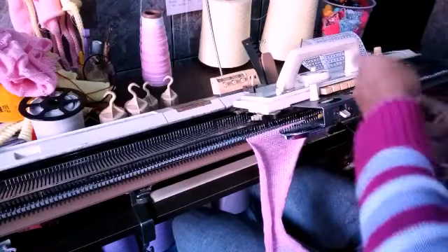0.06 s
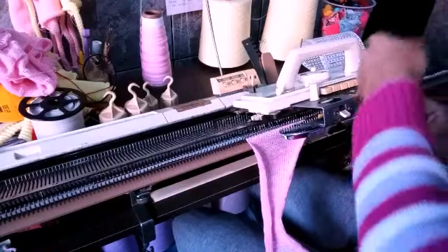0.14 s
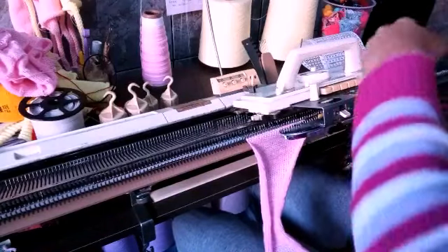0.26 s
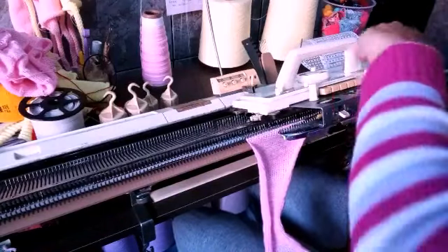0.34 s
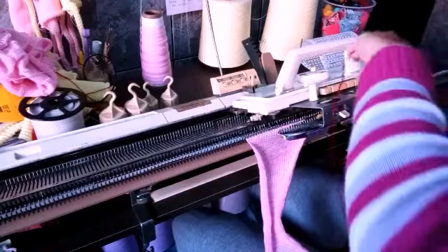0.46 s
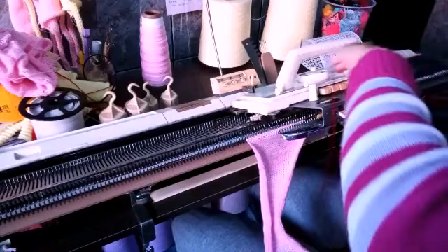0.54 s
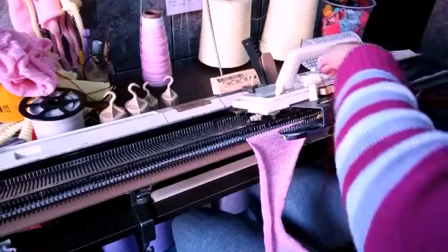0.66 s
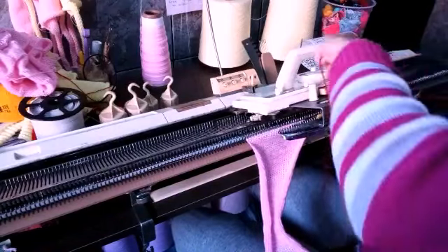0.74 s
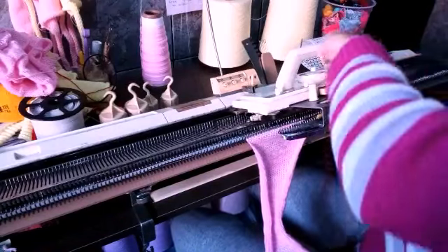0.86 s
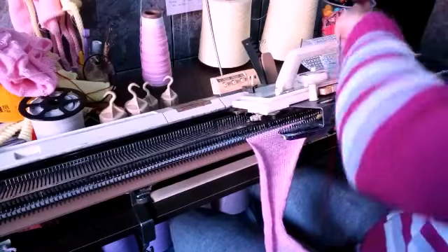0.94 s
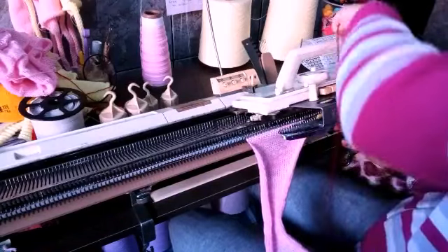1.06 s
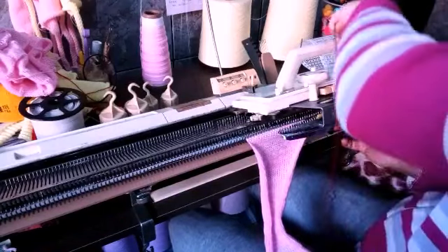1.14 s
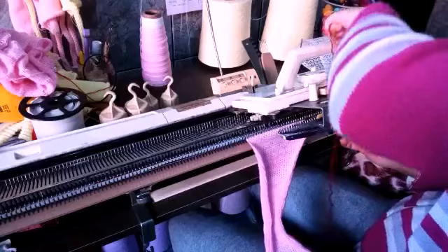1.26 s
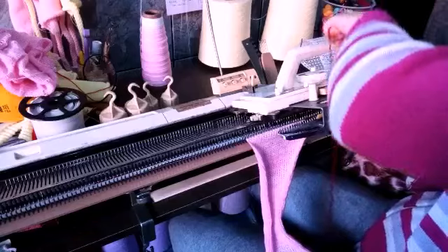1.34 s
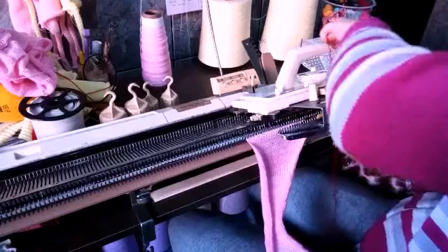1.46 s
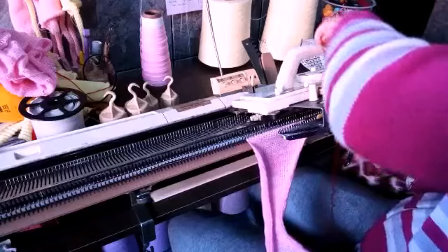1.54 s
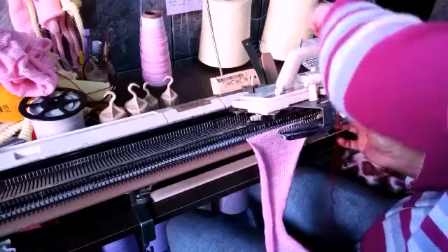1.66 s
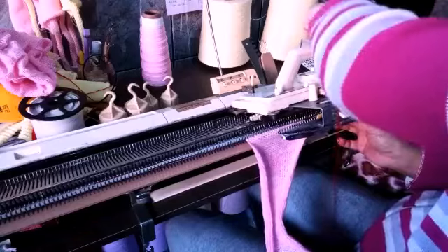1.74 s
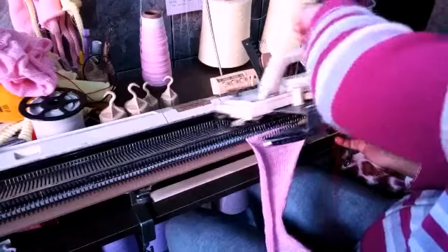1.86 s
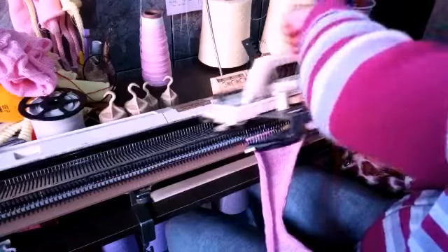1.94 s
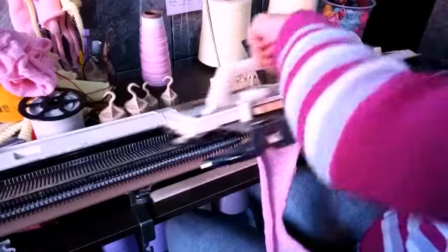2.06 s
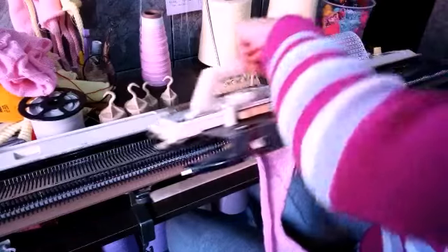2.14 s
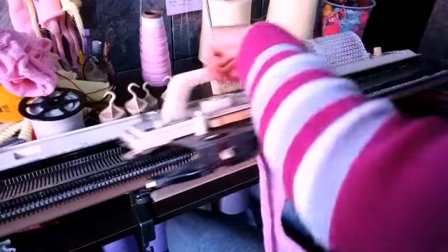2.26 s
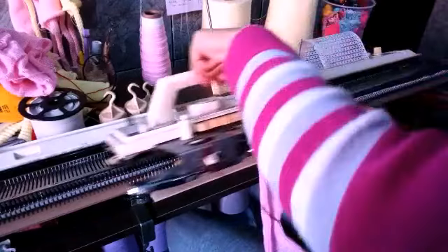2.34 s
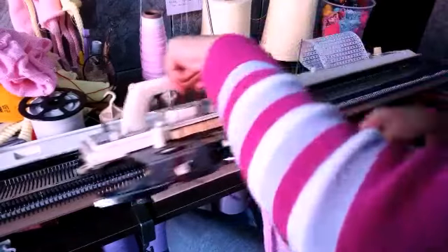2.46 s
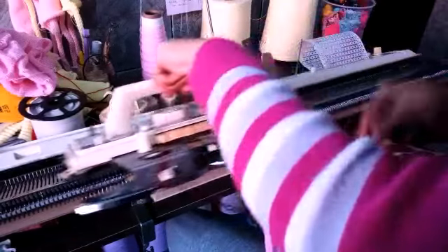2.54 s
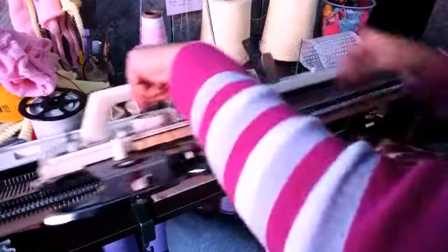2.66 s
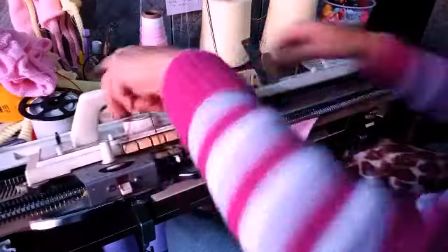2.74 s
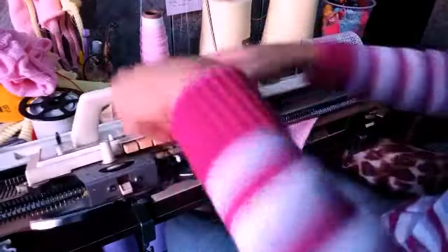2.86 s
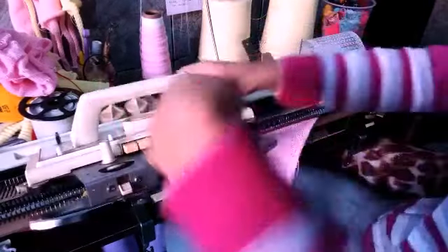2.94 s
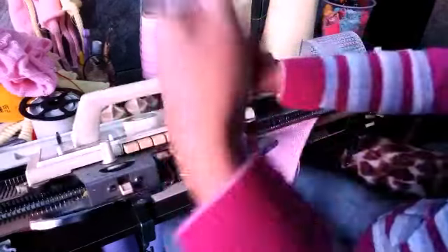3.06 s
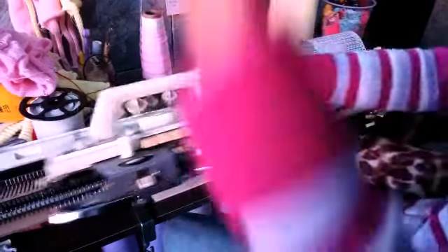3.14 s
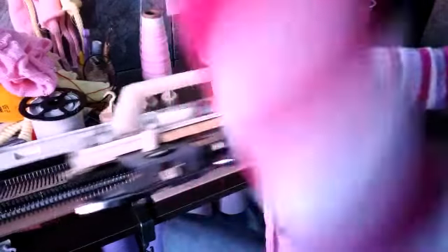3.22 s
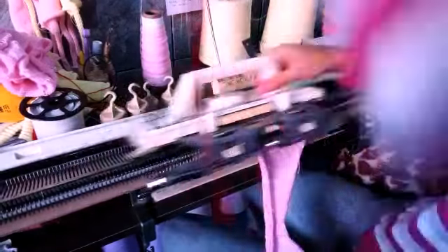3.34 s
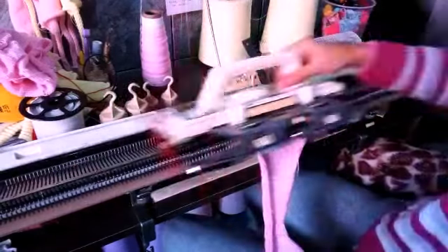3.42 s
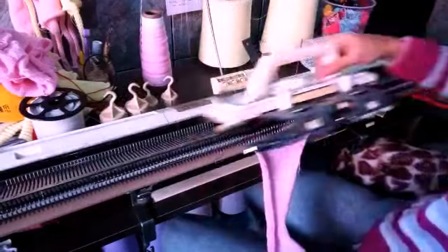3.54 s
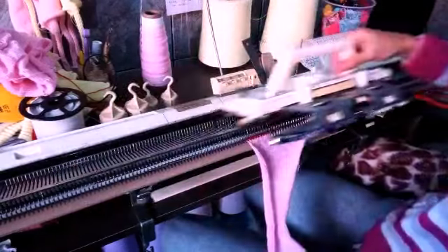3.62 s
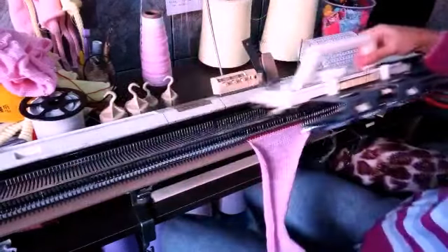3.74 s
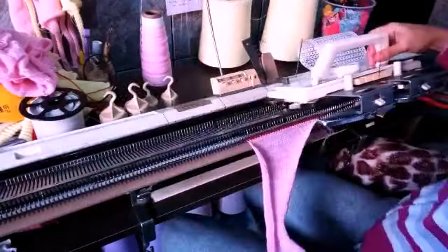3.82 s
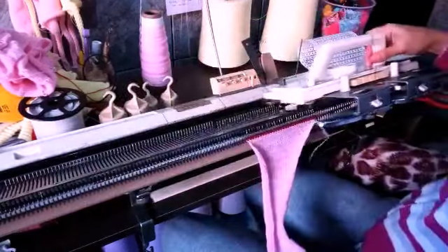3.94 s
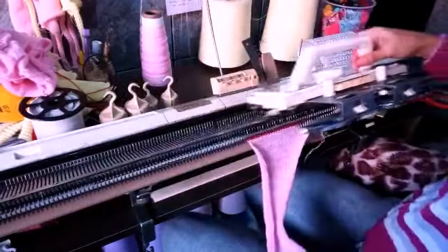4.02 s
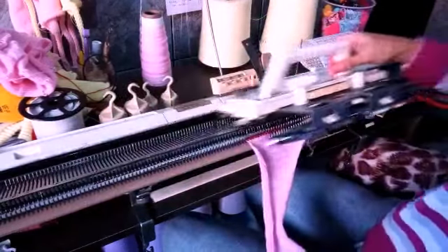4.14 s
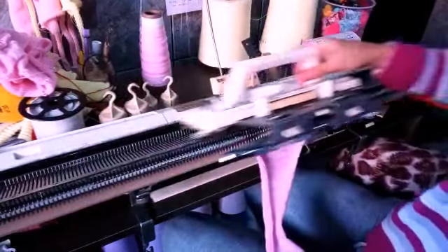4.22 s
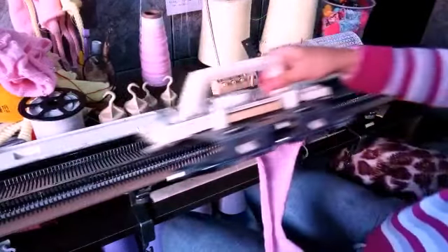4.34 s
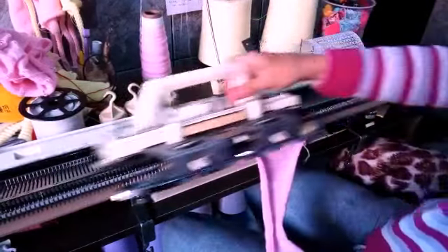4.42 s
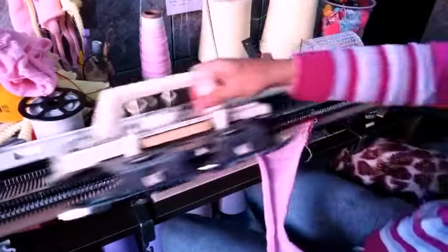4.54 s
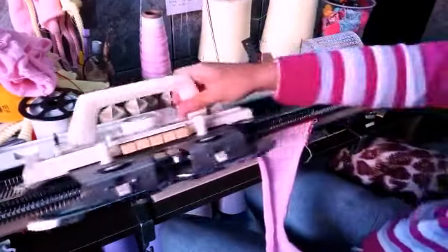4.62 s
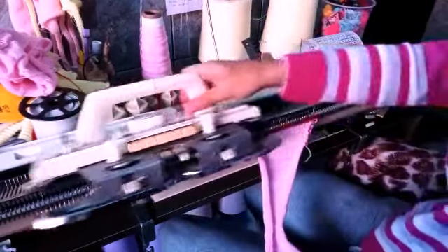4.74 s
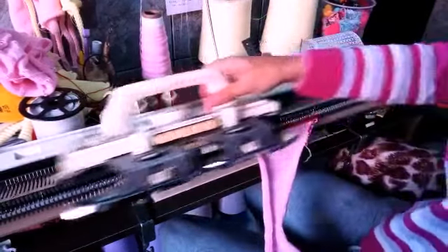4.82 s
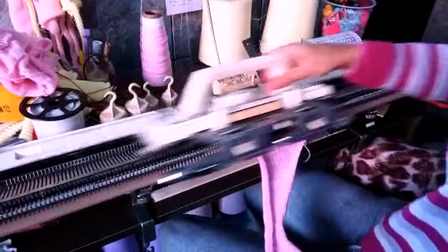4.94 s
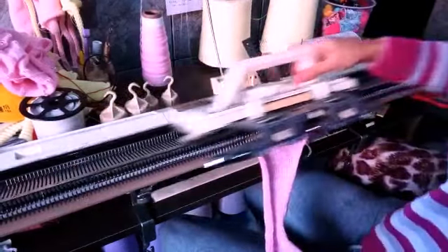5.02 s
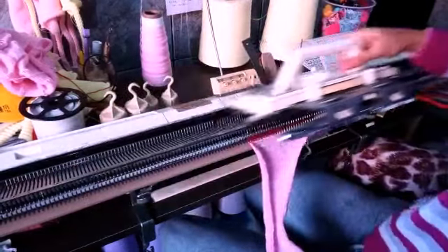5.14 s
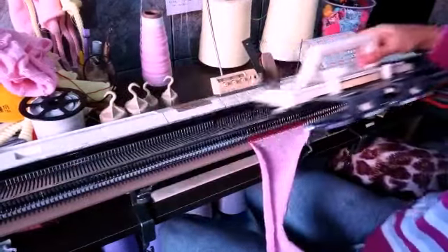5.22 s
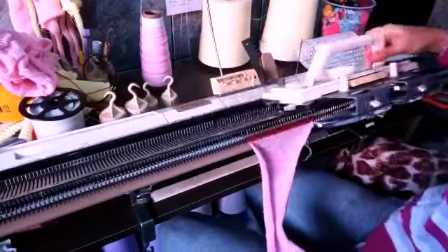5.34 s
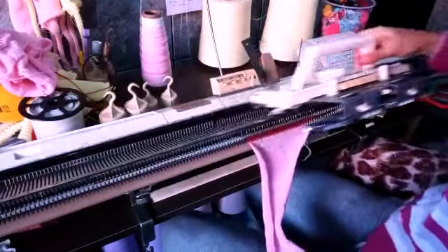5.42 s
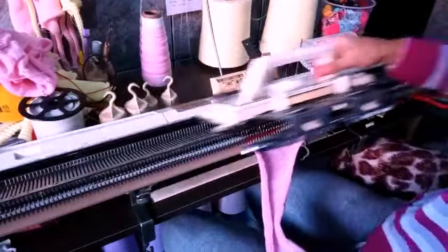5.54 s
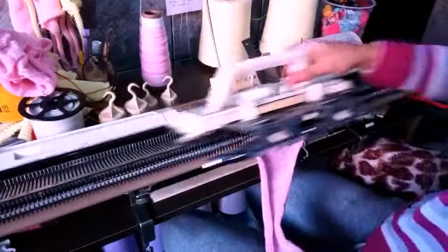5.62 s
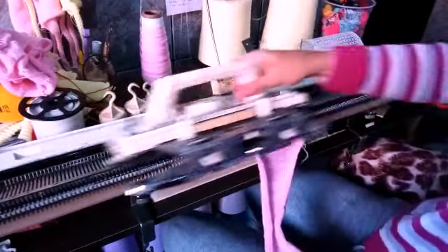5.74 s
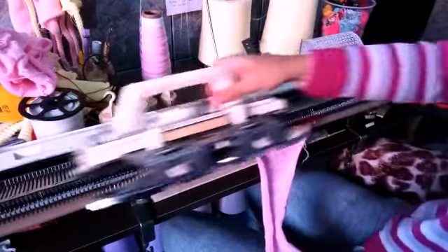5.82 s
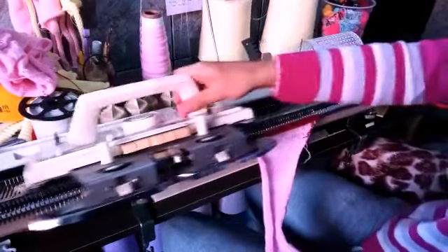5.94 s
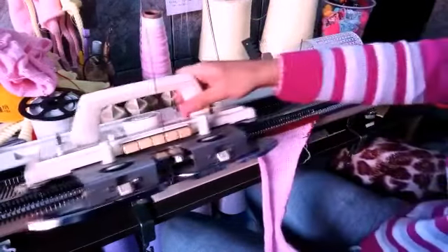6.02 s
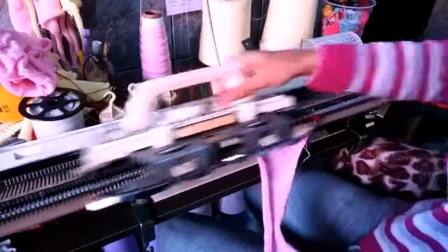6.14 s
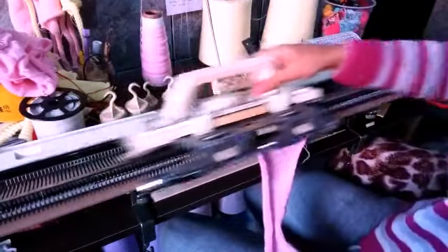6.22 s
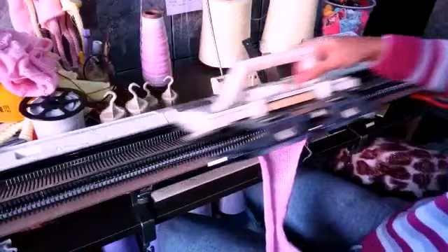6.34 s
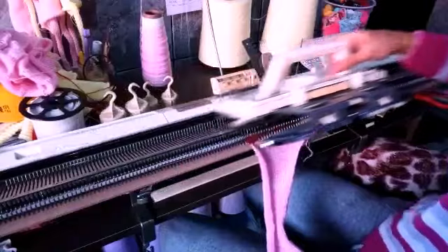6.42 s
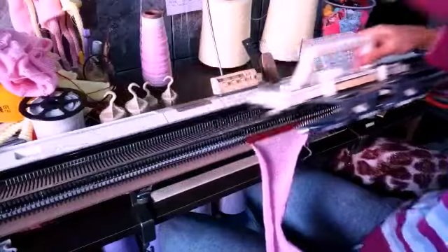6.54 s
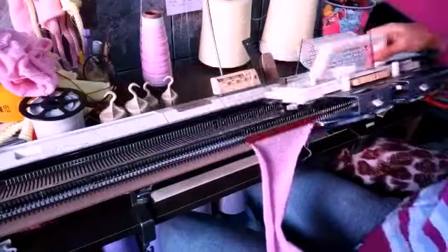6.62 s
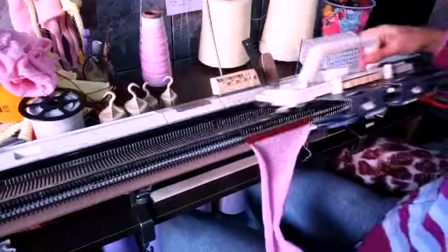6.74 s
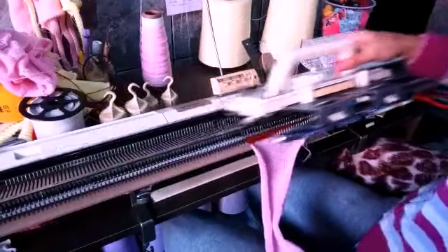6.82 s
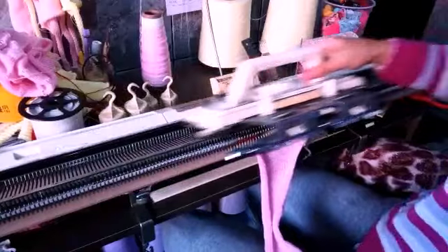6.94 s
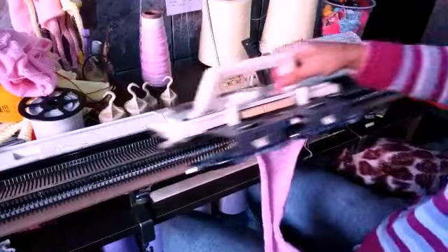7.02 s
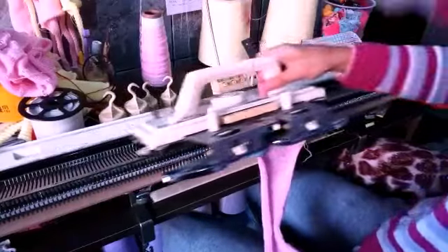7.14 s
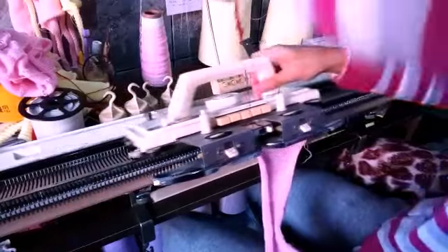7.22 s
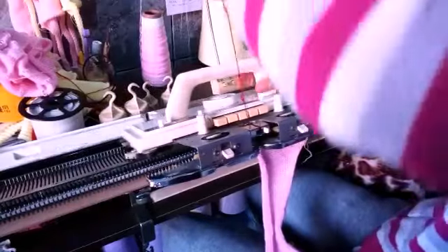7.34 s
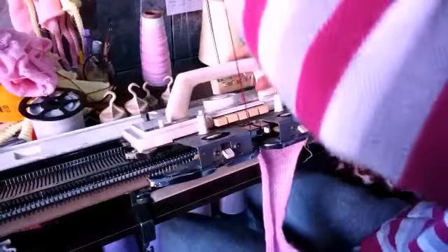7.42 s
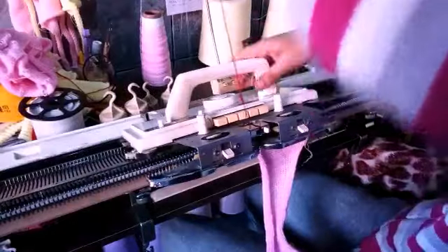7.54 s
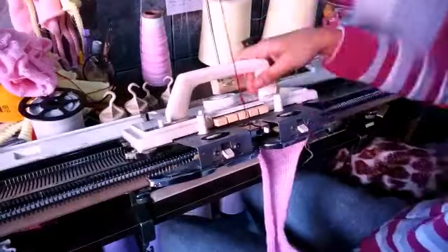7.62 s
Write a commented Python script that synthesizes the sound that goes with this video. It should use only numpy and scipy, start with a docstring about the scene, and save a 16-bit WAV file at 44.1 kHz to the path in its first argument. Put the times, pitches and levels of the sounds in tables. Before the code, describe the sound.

A knitting machine is worked in a small room, heard close in stereo over very faint room noise. Bright steel levers flick at 0.3-0.5 seconds and a small latch clicks at 0.9; soft taps and rubs follow at 1.3-1.5. Around 1.9 a light clack starts the first, moderate scrape, cresting near 2.1 and thinning towards 2.7, where the carriage knocks hollowly. Handling knocks cluster around 3.1-3.4. Then come brisk alternating pushes, cresting at about 3.6, 4.4, 5.1, 5.8, 6.4 and 7.1: dry, hissing rasps with rapid needle chatter, case resonance, low table rumble and fleeting hums, swelling and fading with speed. The middle strokes are loudest. Between them, clustered clacks mark the turns, with bright pawl snaps near 3.9, 5.4 and 6.7 and a weaker one at 7.0. The last, slightly softer scrape runs out by 7.4, leaving near-silence.

```python
"""A few levers click in a small room, then a knitting-machine carriage makes seven long pushes and some nudges.
Its cams scrape the steel needles and rattle them in turn; the case resounds, the table rumbles, brief tones hum.
Pawls snap and the carriage knocks at turns. Scrape and knocks are noise shaped by resonances, the snaps too;
dull case knocks and hums are sines, the needle ring-outs short decaying sines. A faint room noise lies below."""
import sys
import numpy as np
from scipy import signal
from scipy.fft import rfft, irfft, next_fast_len
from scipy.io import wavfile
from scipy.ndimage import uniform_filter1d, map_coordinates

SR = 44100
rng = np.random.default_rng(int(sys.argv[2]) if len(sys.argv) > 2 else 0)


def wav_record(signal):
    """Record a signal, one row per channel, as 16-bit PCM in the file named by sys.argv[1]."""
    frames = np.transpose(np.atleast_2d(signal))
    bounded = np.clip(frames, -1, 1)
    # unit amplitude maps onto the largest positive 16-bit level
    quanta = np.round(bounded * 32767).astype(np.int16)
    wavfile.write(sys.argv[1], SR, quanta)


N = 338247  # samples

# resonances of table, case and needle bed: centre/Hz, width/Hz, lift/dB
BODY_MODES = [(165, 14, 4), (190, 18, 4), (300, 22, 4), (347, 12, 4), (420, 18, 5), (523, 36, 5),
              (740, 38, 4), (872, 54, 5), (1001, 24, 4), (1089, 18, 3), (1186, 32, 3), (1362, 30, 3),
              (2233, 70, 5), (3181, 150, 1.5), (5150, 420, 3.5), (6780, 200, 2), (7680, 200, 2),
              (9750, 250, 2), (14450, 400, 4)]
# snaps of the sprung pawls: t/s, relative level/dB, left-right/dB
PAWL_SNAPS = [(3.912, -19, -2.5), (5.385, -19, -2), (6.724, -19, -0.5), (6.974, -26.5, -2)]


def amp(db):
    """Decibels to gain."""
    return 10 ** (np.asarray(db) / 20)


def unit(x):
    """Scale to rms 1."""
    return x / np.sqrt(np.mean(x ** 2) + 1e-20)


def summed_db(levels_db):
    """Power sum of levels, in dB."""
    power = sum(amp(db) ** 2 for db in levels_db)
    return 20 * np.log10(np.sqrt(power) + 1e-7)


def along(points, hz):
    """(Hz, value) points interpolated on a log frequency axis."""
    f, v = np.transpose(points)
    return np.interp(np.log(hz + 1), np.log(f + 1), v)


def wobble(knots_per_s):
    """Smooth random curve through normally distributed knots."""
    knots = rng.standard_normal(int(N * knots_per_s / SR) + 4)
    return map_coordinates(knots, [np.arange(N) * knots_per_s / SR])


def filtered(x, response):
    """Apply a frequency response to x, zero-padded by at least half a second."""
    size = x.shape[-1]
    m = next_fast_len(size + SR // 2)
    spectrum = rfft(x, m) * response(np.fft.rfftfreq(m, 1 / SR))
    return irfft(spectrum, m)[..., :size]


def causal(db):
    """Minimum-phase response with these gains: it rings only after a blow."""
    cepstrum = irfft(np.log(amp(db)))
    half = len(cepstrum) // 2
    cepstrum[1:half] *= 2
    cepstrum[half + 1:] = 0
    return np.exp(rfft(cepstrum))


def lift(modes, hz):
    """Summed gain in dB of a set of resonances."""
    return sum(db / (1 + (2 * (hz - centre) / width) ** 2) for centre, width, db in modes)


def resonated(x, colour, modes):
    """Drive a body having this broad colour and these resonances."""
    return filtered(x, lambda hz: causal(along(colour, hz) + lift(modes, hz)))


def add(track, s, sound):
    """Mix a sound into a track at time s."""
    part = track[..., round(s * SR):][..., :sound.shape[-1]]
    part += sound[..., :part.shape[-1]]


def stereo(pair):
    """Mix two unrelated signals to a left-right likeness and level balance that vary with frequency."""
    # f/Hz, left-right correlation
    likeness = [(30, 0.15), (70, 0.24), (140, 0.9), (260, 0.8), (500, 0.68), (1000, 0.077), (2500, 0.0057)]
    # f/Hz, left-right/dB
    balance = [(200, -0.5), (500, 0), (1000, 3), (2000, 1.1), (4000, -0.3), (12000, 0.5)]

    def mid_side(hz):
        turn = np.arccos(np.clip(along(likeness, hz), -1, 1)) / 2
        return np.array([np.cos(turn), np.sin(turn)])

    mid, side = filtered(pair, mid_side)
    left_right = np.array([mid + side, mid - side])
    return filtered(left_right, lambda hz: amp(np.outer([.5, -.5], along(balance, hz))))


def room(x, wet_db):
    """Add a diffuse room tail: noise decaying at a rate set by frequency; mix scaled to hold power."""
    # f/Hz, t60/s
    decay = [(150, 0.41), (400, 0.73), (1000, 0.33), (3000, 0.34), (7500, 0.31), (15000, 0.24)]
    hz, t, z = signal.stft(rng.standard_normal((2, SR // 2)), SR, nperseg=256)
    fade = amp(-60 * t / along(decay, hz)[:, None])
    build_up = 1 - np.exp(-t / 0.0025)
    tail = signal.istft(z * fade * build_up, SR, nperseg=256)[1]
    echo = signal.fftconvolve(x, tail / np.linalg.norm(tail[0]), axes=1)[:, :x.shape[1]]
    return (x + amp(wet_db) * echo) / np.hypot(1, amp(wet_db))


def crack(contact_s):
    """Unit-energy noise burst: surfaces meet, then chatter and fade over the contact time."""
    t = np.arange(SR // 2) / SR
    meeting = 1 - np.exp(-4 * t / contact_s)
    burst = meeting * np.exp(-t / contact_s) * rng.standard_normal((2, len(t)))
    return burst / np.linalg.norm(burst, axis=1, keepdims=True)


def snaps(hits, colour, modes, contact_s, wet_db):
    """A part strikes its stop: each crack excites its resonances, which ring briefly."""
    out = np.zeros((2, N))
    for s, db, pan_db in hits:
        ring = unit(resonated(crack(contact_s), colour, modes))
        pan = amp([[pan_db / 2], [-pan_db / 2]])
        add(out, s, room(ring, wet_db) * amp(db - 19.0) * pan)
    return out


def still_air():
    """Faint room noise: steady coloured noise."""
    # f/Hz, relative density/dB
    colour = [(15, -59), (25, -26), (32, -16.5), (48, -3), (70, -2), (100, -2), (170, 1), (344, -10),
              (9320, -20.5), (14800, -24), (16000, -32)]
    hiss = filtered(rng.standard_normal((2, N)), lambda hz: amp(along(colour, hz)))
    return amp(-72.5) * unit(hiss)


def latches():
    """Small sprung steel latches click, ringing their resonances."""
    # t/s, relative level/dB, left-right/dB
    hits = [(0.308, -58, -1), (0.900, -44.5, 0), (0.914, -34.5, -1), (0.929, -44, 0)]
    # f/Hz, relative gain/dB
    colour = [(130, -5), (500, -6), (1500, -6), (2800, -9), (3900, -9), (5700, 4), (8500, -5.5),
              (10300, 1.5), (11500, -28), (16000, -29.5)]
    # centre/Hz, width/Hz, lift/dB
    modes = [(720, 70, 8), (1450, 160, 7), (1800, 100, 5), (2250, 160, 7), (2700, 160, 8), (5450, 400, 9),
             (6900, 300, 6), (7550, 200, 4), (9650, 200, 5)]
    return snaps(hits, colour, modes, contact_s=0.003, wet_db=3.5)


def levers():
    """Sprung steel levers flick against their stops, ringing brightly."""
    # t/s, relative level/dB, left-right/dB
    hits = [(0.398, -25.5, -7), (0.401, -29, 7), (0.414, -36.5, 1.5), (0.495, -35.5, -1)]
    # f/Hz, relative gain/dB
    colour = [(100, -21), (400, -12.5), (3500, -5.5), (5500, -2), (9000, 3.5), (13000, -2.5), (16000, -15)]
    # centre/Hz, width/Hz, lift/dB
    modes = [(850, 150, 4), (1880, 220, 3), (8520, 250, 4), (9350, 300, 7)]
    return snaps(hits, colour, modes, contact_s=0.0022, wet_db=0.0)


def contacts():
    """A knock rings case and steel; the longer the contact, the more it shoves the table too."""
    # knocks, taps and short rubs: t/s, relative case level/dB, relative steel level/dB, contact/s
    knocks = [(0.412, -51, -34, 0.013), (0.751, -64.5, -60, 0.0023), (0.921, -57, -59, 0.014),
              (1.296, -61.5, -87, 0.011), (1.411, -67, -85, .008), (1.458, -67, -82, .004),
              (1.525, -47.5, -41, 0.003), (1.54, -58, -45, 0.0054), (1.724, -54, -68, 0.0069),
              (1.935, -52, -54, 0.003), (1.958, -59, -43.5, 0.007), (1.982, -60, -44.5, .008),
              (2.008, -64.5, -40, .005), (2.700, -34.5, -33, 0.0029), (2.836, -46.5, -58, 0.00082),
              (3.080, -49, -58, 0.0011), (3.128, -46, -64.5, 0.01), (3.144, -38.5, -59, 0.0014),
              (3.160, -37.5, -54, 0.0045), (3.174, -45, -53.5, 0.0017), (3.187, -41.5, -58.5, 0.0026),
              (3.201, -54, -63.5, .002), (3.285, -42.5, -48.5, 0.003), (3.376, -42, -35.5, 0.003),
              (3.838, -36.5, -28.5, 0.002), (3.850, -34.5, -34, 0.0045), (4.164, -58.5, -48, 0.0027),
              (4.176, -51, -34.5, 0.0024), (4.203, -54, -40, 0.0017), (4.232, -33, -32, 0.0025),
              (4.243, -32, -24, 0.0046), (4.666, -35.5, -32.5, 0.0012), (4.712, -47.5, -50.5, 0.0017),
              (4.830, -40, -46, 0.0017), (4.907, -53.5, -41.5, 0.0048), (4.97, -50, -40.5, 0.0032),
              (4.995, -45, -28, .009), (5.324, -30.5, -26, 0.0095), (5.57, -60.5, -46, .002),
              (5.579, -40.5, -33.5, 0.0023), (5.592, -43, -35.5, 0.0051), (5.621, -38.5, -32.5, 0.0012),
              (5.632, -30.5, -24, 0.0067), (6.005, -31.5, -31, 0.0028), (6.125, -47.5, -56, .003),
              (6.208, -61, -53, 0.0034), (6.229, -56.5, -37.5, 0.0023), (6.249, -57.5, -49, 0.0014),
              (6.265, -58, -34, 0.0026), (6.656, -34.5, -26, 0.011), (6.903, -64.5, -49, 0.0029),
              (6.919, -45, -34, 0.002), (6.936, -38.5, -33.5, 0.0077), (6.963, -37, -34.5, 0.0011),
              (6.973, -37, -23.5, 0.0061)]
    # carriage knock with each pawl snap: case re snap/dB, steel re snap/dB, contact/s
    pawl_knock = (-13.5, -7.5, 0.0058)
    shove_db, shove_db_per_doubling = -4.5, 9  # table re case, growing with contact time
    bed_of_case_db, bed_of_steel_db = -2, -6  # shares reaching the needle bed

    out = np.zeros((2, N))
    case_rel_db, steel_rel_db, pawl_s = pawl_knock
    with_pawls = [(s, db + case_rel_db, db + steel_rel_db, pawl_s) for s, db, _ in PAWL_SNAPS]
    for s, case_db, steel_db, contact_s in knocks + with_pawls:
        table_db = case_db + shove_db + shove_db_per_doubling * np.log2(contact_s / 0.0028)
        bed_db = summed_db([case_db + bed_of_case_db, steel_db + bed_of_steel_db])
        colour = [(35, table_db - 28.5), (140, table_db), (260, case_db + 6.5), (1000, case_db + 7.0),
                  (1800, bed_db), (3800, bed_db + 2.0),
                  (6500, steel_db + 0.5), (10500, steel_db - 3.0), (16000, steel_db - 18.5)]
        ring = resonated(crack(contact_s), colour, BODY_MODES)
        add(out, s, amp(31.0) * room(ring, wet_db=1.5))
    return out


def drags():
    """Case and table levels in dB of dull rubs: the carriage is handled or drags, at turns and within pushes."""
    # middle/s, half length/s, case level/dB, table level/dB
    rubs = [(1.28, 0.021, -68, -67), (1.452, 0.049, -72, -65), (2.098, 0.16, -47.5, -60),
            (2.217, 0.036, -45, -50), (2.534, 0.17, -46.5, -56), (2.768, 0.074, -57, -49),
            (2.914, 0.069, -65, -57), (3.087, 0.018, -50.5, -55), (3.196, 0.046, -49.5, -58.5),
            (3.332, 0.021, -68, -48), (3.837, 0.075, -41, -46), (3.954, 0.061, -44.5, -57.5),
            (4.134, 0.02, -47, -40), (4.206, 0.042, -44.5, -54), (4.27, .04, -44.5, -48),
            (4.745, 0.058, -51, -48), (4.93, 0.034, -66, -62), (5.306, 0.019, -34.5, -45),
            (5.515, 0.05, -50, -56), (6.074, 0.081, -50, -56.5), (6.668, 0.14, -42.5, -44.5),
            (7.321, .04, -49.5, -67)]
    t = np.arange(N) / SR
    swell_db = lambda s, half: -10 * np.minimum(((t - s) / half) ** 2, 20)
    return summed_db(np.add.outer([case_db, table_db], swell_db(s, half))
                     for s, half, case_db, table_db in rubs)


def pushes():
    """Needle hiss in dB: each push of the carriage runs up, crests and runs out."""
    # full rows and nudges: fastest at/s, run-up/s, run-out/s, crest level/dB
    passes = [(2.075, 0.13, 0.13, -36), (2.185, 0.23, 0.56, -32.5), (2.531, 0.16, 0.17, -45),
              (2.779, 0.051, 0.14, -49.5), (3.309, 0.075, 0.17, -57), (3.585, 0.3, 0.42, -27),
              (4.428, 0.28, .36, -24.5), (5.14, 0.23, 0.31, -23), (5.77, 0.21, .335, -23.5),
              (6.215, 0.06, 0.11, -55.5), (6.315, 0.07, 0.12, -37.5), (6.44, 0.21, 0.31, -23),
              (7.095, 0.21, 0.31, -26.5)]
    swing_db, roundness = 30.5, 1.66  # level change over a run-up or run-out; crest shape
    t = np.arange(N) / SR

    def level_db(s, up_s, down_s, crest_db):
        away = np.maximum((s - t) / up_s, (t - s) / down_s)
        return crest_db - swing_db * np.minimum(away, 4) ** roundness

    return summed_db(level_db(*push) for push in passes)


def needle_hits(speed, rate, scatter, uneven, life_s):
    """Chatter of rms 1: each needle butt strikes the cams in turn, more often and harder at speed."""
    passed = np.cumsum(speed) * rate / SR  # needles; rate is per second at speed 1
    needle = np.arange(1, int(passed[-1]))
    chance = rng.uniform(-1, 1, (len(needle), 2))
    at = np.clip(np.searchsorted(passed, needle + scatter * chance[:, 0]), 0, N - 1)
    blows = np.bincount(at, (1 + uneven * chance[:, 1]) * np.sqrt(speed[at]), N)
    envelope = signal.lfilter([1], [1, -np.exp(-1 / (life_s * SR))], blows)
    return unit(envelope * rng.standard_normal((2, N)))


def shifting(x, depth_db):
    """Random patches of gain in time and frequency: each needle met rings a little differently."""
    z = signal.stft(x, nperseg=512)[2]
    field = uniform_filter1d(rng.standard_normal(z.shape[1:]), size=3, axis=0)
    field = uniform_filter1d(field, size=5, axis=1)
    return signal.istft(z * amp(depth_db * unit(field)), nperseg=512)[1][:, :N]


def detuned(x):
    """The travelling weight of the carriage makes pitch drift: x is read at a varying rate."""
    detune, knots_per_s = .035, 7  # rate deviation as a share of pitch
    index = np.arange(N)
    drift = signal.lfilter([1], [1, -np.exp(-1 / SR)], detune * wobble(knots_per_s))  # samples
    return np.array([np.interp((index + drift) % N, index, side) for side in x])


def needle_rings():
    """Needles let go by the cams: short decaying sines of random time, pitch and strength."""
    # f/Hz, level re hiss/dB
    tones = [(1000, -14), (2280, -20), (3150, -20), (5150, -15)]
    rings_per_s, decay_s, spread = 30, .009, .055  # spread is a share of pitch
    out, t = np.zeros((2, N)), np.arange(SR // 12) / SR
    fade = np.exp(-t / decay_s) * (1 - np.exp(-4 * t / decay_s))
    for hz, db in tones:
        track = np.zeros((2, N))
        for when, tune, size, *phase in rng.random((int(rings_per_s * N / SR), 5)):
            pitch_hz = hz * (1 + spread * (2 * tune - 1))
            tone = np.sin(2 * np.pi * np.add.outer(phase, pitch_hz * t))
            add(track, when * N / SR, size ** 2 * fade * tone)
        out += amp(db) * unit(track)
    return out


def carriage():
    """Sliding friction and needle chatter shake the table, the case and the steel bed."""
    # colours of the moving parts: f/Hz, relative density/dB
    table_colour = [(25, -29), (55, -24.5), (90, -12.5), (115, -3), (130, 4), (165, 2), (200, 2), (235, -7),
                    (320, -26), (700, -77.5)]
    case_colour = [(120, -42.5), (230, -8.5), (280, -3.5), (380, -7.5), (500, -0.3), (640, 0), (900, 0.5),
                   (1150, 3), (1600, -6), (2300, -7.5), (3500, -4.5), (8000, -86)]
    needle_colour = [(600, -54), (1500, -5), (2600, -4.5), (3300, -1.8), (4650, -1), (5000, -0.5),
                     (6000, 0.4), (7200, 0.5), (10000, -0.9), (13000, -5), (15000, -15), (16500, -50.5)]
    brisk_db = -25  # needle hiss of a brisk push
    case_brisk_db, case_db_per_db = -31.5, 0.75  # level at a brisk push, growth per dB of hiss
    table_brisk_db, table_db_per_db = -48.5, 0.61
    sway_db, sway_knots_per_s = -0.1, 18  # uneven table level
    rub_top_hz = 2100  # rubs are duller than needle chatter above this

    needle_db = pushes()
    case_drag_db, table_drag_db = drags()
    pace_db = needle_db - brisk_db
    table_db = summed_db([table_brisk_db + table_db_per_db * pace_db, table_drag_db])
    table_db = table_db + sway_db * wobble(sway_knots_per_s)
    speed = np.clip(amp(.3 * (pace_db - 3)), .3, 2)
    chatter = needle_hits(speed, rate=370, scatter=.4, uneven=.8, life_s=.0014)

    def part(colour, chatter_share, patchy_db):
        friction = rng.standard_normal((2, N))
        drive = shifting(chatter_share * chatter + friction, patchy_db)
        return unit(resonated(drive, colour, BODY_MODES))

    table = amp(table_db) * detuned(part(table_colour, chatter_share=0.64, patchy_db=6.0))
    case_db = case_brisk_db + case_db_per_db * pace_db
    case = amp(case_db) * detuned(part(case_colour, chatter_share=0.5, patchy_db=2.5))
    dull = filtered(part(case_colour, chatter_share=0, patchy_db=3.5),
                    lambda hz: 1 / np.hypot(1, (hz / rub_top_hz) ** 3))
    rub = amp(case_drag_db) * unit(dull)
    steel = amp(needle_db) * part(needle_colour, chatter_share=.38, patchy_db=1.6)
    rings = amp(needle_db) * needle_rings()
    return room(table + case + rub + steel + rings, wet_db=-11.0)


def rocks():
    """The carriage rocks on its rail and knocks the hollow case or thumps the table: damped sines."""
    # t/s, relative level/dB, f/Hz
    thumps = [(1.299, -43, 960), (1.308, -43, 312), (1.724, -50, 960), (1.856, -41, 660),
              (2.66, -38.5, 196), (2.700, -21, 520), (2.734, -23, 549), (2.742, -37, 190),
              (3.088, -37.5, 393.4), (3.144, -21, 776), (3.155, -41, 215), (3.168, -22, 870),
              (3.19, -29, 740), (3.811, -35, 184), (4.246, -24, 413), (4.667, -20, 537),
              (4.699, -18.5, 520), (4.728, -38.5, 188.7), (5.142, -28.5, 163), (5.313, -29, 175),
              (5.621, -12, 1053), (5.819, -39, 171.8), (5.869, -34, 160), (6.007, -19.5, 524),
              (6.039, -19.5, 528), (6.278, -43.5, 135.2), (6.435, -30, 190.6), (6.642, -31.5, 148),
              (6.978, -24, 436.3)]
    out, t = np.zeros(N), np.arange(SR // 4) / SR
    for s, db, hz in thumps:
        envelope = np.exp(-hz * t / 3.28) * (1 - np.exp(-t / 0.005))  # decays to 1/e in 3.28 cycles
        add(out, s, amp(db) * np.sin(2 * np.pi * hz * t) * envelope)
    return room(np.array([out, out]), wet_db=-9.0)


def judders():
    """The sliding carriage judders and hums one resonance: a wandering sine that swells and fades."""
    # middle/s, half length/s, f/Hz, peak amplitude/dB
    hums = [(1.34, 0.042, 350, -60), (2.79, 0.059, 195, -45), (2.907, 0.02, 195, -46),
            (3.579, 0.033, 178, -36.5), (3.79, 0.16, 126.7, -45.5), (4.553, 0.051, 297, -40.5),
            (4.805, 0.1, 299.3, -50.5), (5.207, 0.068, 186.7, -36.5), (5.845, 0.042, 500.8, -32.5),
            (5.985, 0.15, 354, -47.5), (6.37, 0.032, 540, -38.5), (6.51, 0.053, 178, -40),
            (6.706, 0.053, 143.2, -50.5), (6.993, 0.022, 420, -38.5), (7.29, .05, 555, -49)]
    wander_hz = 7
    out, t = np.zeros(N), np.arange(N) / SR
    wander = np.cumsum(wobble(40)) / SR
    for middle, half, hz, db in hums:
        near = np.abs(t - middle) < 3 * half
        swell = np.exp(-((t[near] - middle) / half) ** 2)
        cycles = hz * t[near] + wander_hz * wander[near]
        out[near] += amp(db) * swell * np.sin(2 * np.pi * cycles)
    return out


def cams():
    """The cams meet the first needles with a clack, ringing mostly low resonances."""
    # t/s, relative level/dB, left-right/dB
    hits = [(1.856, -37, 0), (1.866, -42, 0), (3.122, -40, 0)]
    # f/Hz, relative gain/dB
    colour = [(200, -12), (450, 0), (900, -1), (1250, -6), (2900, -9.5), (4500, -12), (7000, -20),
              (16000, -34)]
    # centre/Hz, width/Hz, lift/dB
    modes = [(480, 70, 4), (630, 70, 7), (899, 90, 4), (1680, 200, 3), (2750, 400, 3)]
    return snaps(hits, colour, modes, contact_s=0.0022, wet_db=-3.5)


def pawls():
    """Sprung steel pawls snap against their stops, ringing high resonances."""
    # f/Hz, relative gain/dB
    colour = [(1500, -5), (3000, -20.5), (5000, -7.5), (8000, 3.5), (11000, -8), (15500, -3.5),
              (16500, -20)]
    # centre/Hz, width/Hz, lift/dB
    modes = [(6750, 600, 3), (8140, 800, 2.9), (12400, 2700, 13)]
    return snaps(PAWL_SNAPS, colour, modes, contact_s=.0012, wet_db=-5)


def scene():
    """The machine in its room; rocks and judders stay centred, outside the stereo spread."""
    clicks = latches() + levers() + cams() + pawls()
    spread = still_air() + clicks + contacts() + carriage()
    return stereo(spread) + rocks() + judders()


def record(dry):
    """Cut everything from the band limit up."""
    top_hz = 15900
    return filtered(dry, lambda hz: hz < top_hz)


dry = scene()
out = record(dry)
wav_record(out)
```